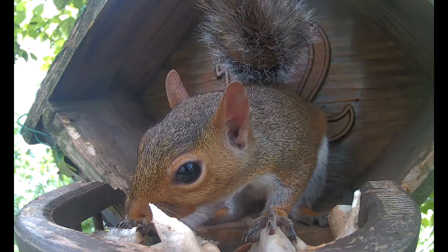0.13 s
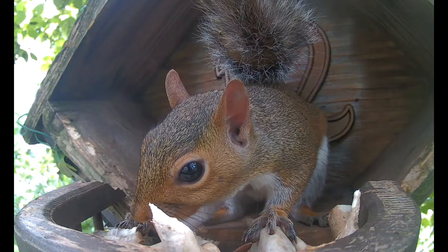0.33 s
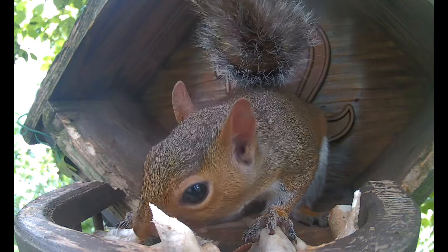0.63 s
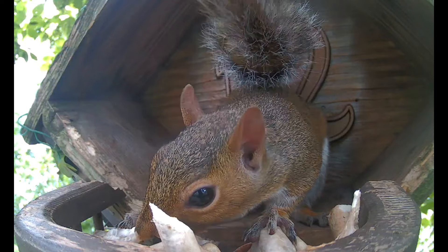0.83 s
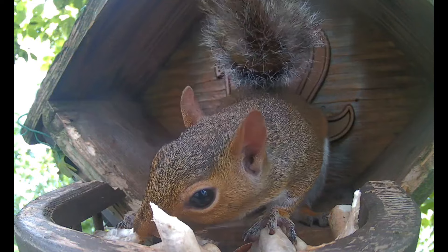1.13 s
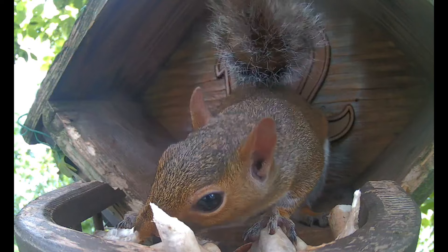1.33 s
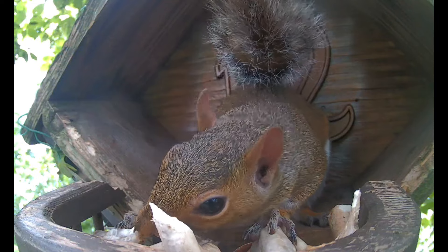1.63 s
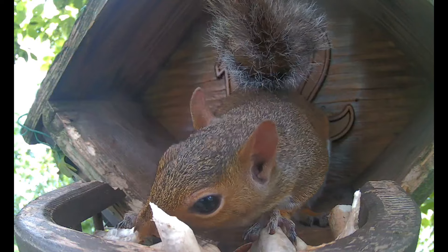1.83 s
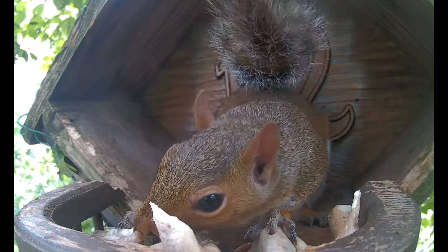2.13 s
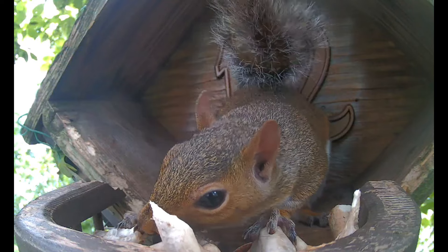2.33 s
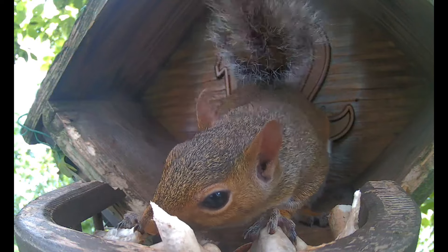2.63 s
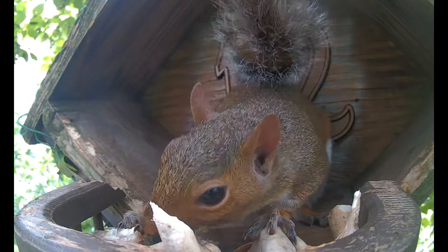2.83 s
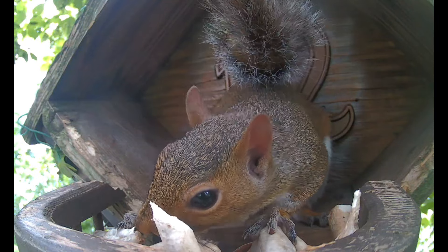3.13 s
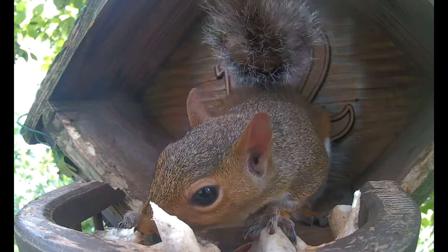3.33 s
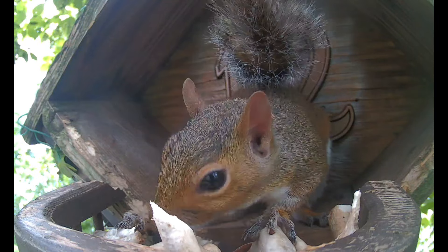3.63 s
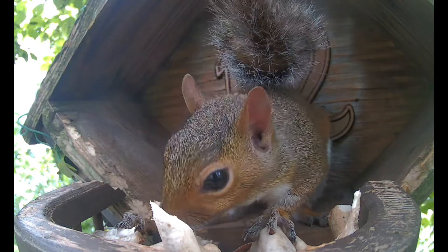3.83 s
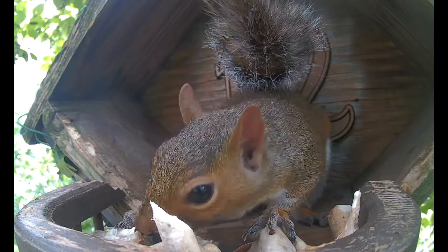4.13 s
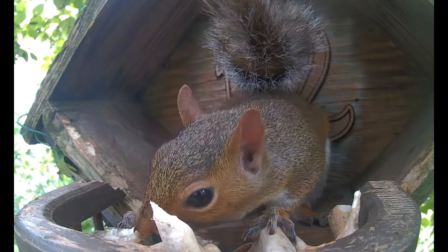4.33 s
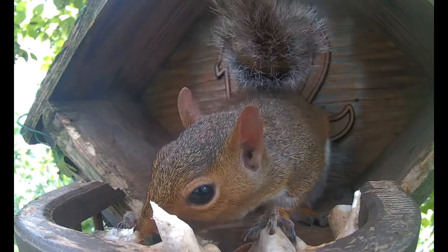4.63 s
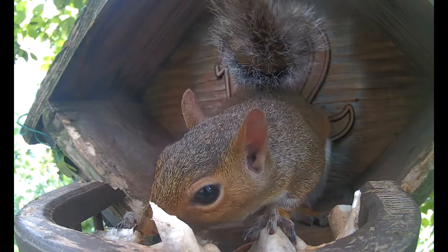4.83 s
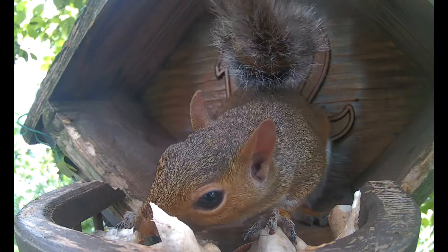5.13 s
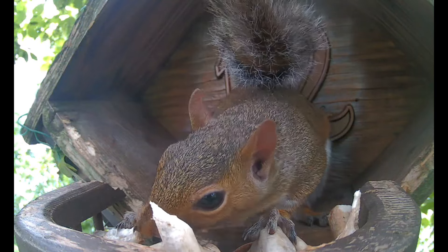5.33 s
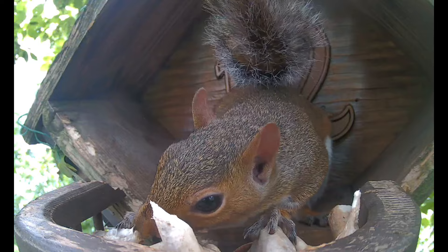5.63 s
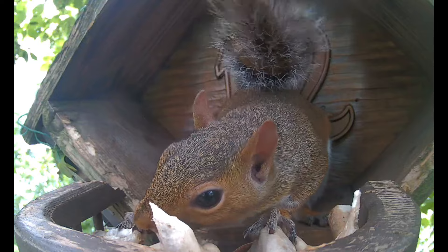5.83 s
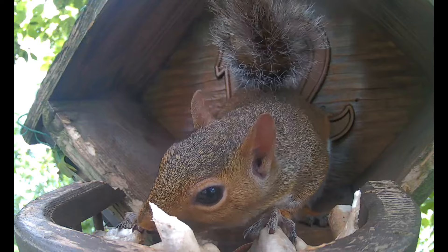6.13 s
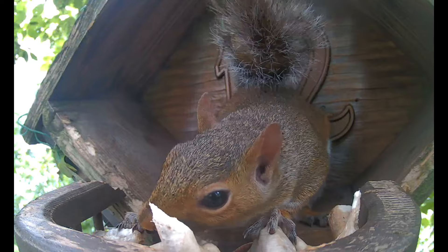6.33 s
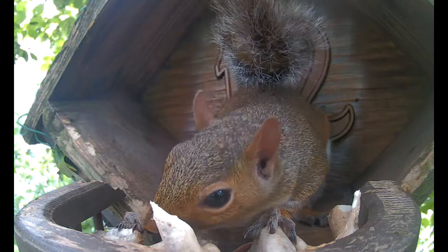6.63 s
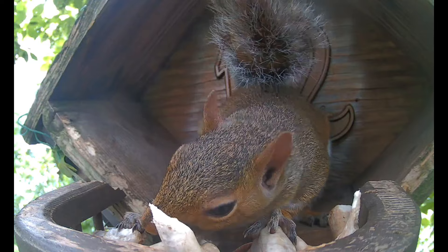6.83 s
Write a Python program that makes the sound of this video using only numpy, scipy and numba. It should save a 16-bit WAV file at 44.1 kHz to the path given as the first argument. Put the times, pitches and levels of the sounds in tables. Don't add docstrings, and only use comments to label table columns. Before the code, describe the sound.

At 0 s the tail of a squirrel's bark is cut off within 0.05 s, ending in a high squeak and a short leafy echo. Near quiet follows: soft hiss, low wind and faint throbbing hum. From 0.5 s teeth tick on seed shell, faint and dry, growing to clear cracks with dull wooden thuds by 2-2.9 s; small airy snorts pass, the longest just before 2.9 s. From 2.94 to 3.45 s comes a loud, hoarse, buzzing bark, swelling late. A pause holds only a couple of faint ticks and a barely audible motor whine around 3.6-4.3 s. Gnawing resumes at 4.3 s, brisker, while a distant squirrel calls blurrily at 4.4-4.95 s. A rough bark sounds at 5.47-5.83 s. The strongest snaps and frame knocks run from 5.9 s to 7 s, with a louder far answer at 6.1-6.7 s. Close, boxy, narrow sound.

```python
import sys
import numpy as np
from scipy import signal
from scipy.io import wavfile
from scipy.ndimage import uniform_filter1d
from numba import njit

SR = 44100
rng = np.random.default_rng(int(sys.argv[2]) if len(sys.argv) > 2 else 0)


def to_linear_factor(level_db):
    exponent = np.asarray(level_db, float) / 20
    return 10 ** exponent


def to_wav(sig):
    pcm = np.clip(np.atleast_2d(sig), -1, 1) * 32767
    pcm = np.round(pcm).astype(np.int16)
    wavfile.write(sys.argv[1], SR, pcm.T)


N = 307369
TIME_S = np.arange(N) / SR

# (time [s], pitch [Hz], roughness [0-1], strong-weak pairing [0-1])
FOLDS = [
    [(0, 383, .1, 0), (.012, 405, .06, 0), (.026, 421, .04, 0), (.039, 428, .06, 0)],
    [(2.945, 405, .08, 0), (2.978, 475, .25, .2), (3.02, 472, .45, .25), (3.045, 505, .45, .3),
     (3.09, 470, .45, .2), (3.125, 500, .4, .15), (3.21, 470, .35, .4), (3.305, 512, .35, .7),
     (3.435, 435, .25, .25)],
    [(5.473, 410, .1, 0), (5.497, 445, .25, 0), (5.53, 412, .35, .3), (5.555, 455, .3, .5),
     (5.605, 500, .35, .4), (5.67, 490, .4, .2), (5.71, 455, .4, .4), (5.75, 460, .35, .6),
     (5.82, 475, .35, 0)],
]
# (time [s], level [dB], mouth resonance [Hz], second mouth resonance [Hz])
EFFORT = [
    [(0, -15, 2494, 4413), (.034, -20, 2232, 4362), (.046, -19, 2070, 3532)],
    [(2.945, -15, 1873, 3564), (2.995, -17.5, 2564, 3435), (3.06, -14, 2810, 3025), (3.17, -12, 2247, 3456),
     (3.2, -9.5, 2195, 4383), (3.31, -9.5, 2514, 4380), (3.4, -12.5, 2080, 4300),
     (3.436, -13.5, 2057, 3450)],
    [(5.472, -13.5, 2160, 3800), (5.498, -13.5, 2305, 3550), (5.54, -15, 2422, 3040),
     (5.622, -11.5, 2540, 3170), (5.69, -13, 2204, 3420), (5.768, -9.5, 2530, 4000),
     (5.812, -12, 2100, 4100)],
]
# (start [s], rise [s], end [s], fall [s])
VOICING = [
    (-.1, .005, .052, .011),
    (2.936, .008, 3.447, .026),
    (5.465, .008, 5.829, .016),
]
# (start [s], length [s], pitch [Hz], roughness [0-1])
BREAKS = [
    (.038, .03, 1760, .01),
    (2.93, .011, 620, .2),
    (3.309, .023, 585, .12),
    (5.46, .009, 620, .2),
    (5.762, .029, 585, .17),
]
# (time [s], lower [dB], middle [dB], upper [dB], top throat resonance [dB])
JAW = [
    [(0, -6.5, 0, -3.5, 3), (.036, -7, 2.5, -6, -1.5), (.046, 3.5, -4.5, 10.5, -5)],
    [(2.945, -0.5, -2.5, -7, 9), (3.0, 3, -2.5, 1, -3.5), (3.1, 2, 2, 1.5, -9), (3.16, 0, 3, -1, -4),
     (3.205, 2, -1.5, -2.5, 11), (3.255, 3, -3, -3, 6.5), (3.315, 0, 0.5, -4, -4.5),
     (3.39, -1, -3.5, 2, 6.5), (3.44, 3.5, -3, -1, -4.5)],
    [(5.47, -4.5, -8, -9, 6), (5.52, -1.5, 3, -8, 1), (5.6, 2.5, 6, -6, -16.5), (5.68, 1.5, 0, -0.5, 8),
     (5.75, 4, 4.5, 1, 3.5), (5.82, -5.5, -2, -7.5, -6.5)],
]
THROAT_HZ = [1770, 2500, 3600, 4200]
# (frequency [Hz], width [Hz], level [dB])
CHEST = [(298, 78, -26.5), (407, 83, -24), (740, 110, -27.5), (970, 130, -20), (1180, 120, -27.5)]
# (frequency [Hz], width [Hz], level [dB])
OVERTONES = [(5190, 740, -44), (7250, 540, -46.5), (4650, 180, -46.5)]
# (frequency [Hz], width [Hz], level [dB])
HOUSING = [(337, 23, -10), (440, 59, -14), (961, 170, -9), (1148, 87, -7.5), (1703, 183, -0.5),
           (2264, 300, -2.5), (2540, 95, 2), (3052, 530, -7.5), (3578, 190, 4), (4237, 150, -25.5)]
# (frequency [Hz], width [Hz], depth [0-1])
VALLEYS = [(620, 47, 0.6), (1365, 540, 1), (1992, 140, 1), (4000, 490, .7)]
# (time [s], peak [dB], brightness [dB], thud through wood [dB])
CRACKS = [(.526, -59.5, 8, -82), (.6921, -62, -12, -51), (.7032, -50.5, -10, -43.5), (.85, -53, -31.5, -48),
          (.8632, -40, -26, -44.5), (.8895, -48, -9, -74), (.8997, -33, -19, -43.5), (.9165, -44, -11, -66),
          (.9258, -39, -6, -54), (1.0428, -57, -26, -62), (1.0624, -43, -36, -50.5), (1.08, -34, -27, -76),
          (1.0974, -34.5, -25, -44), (1.2274, -54, -22, -54.5), (1.243, -55, -30, -75),
          (1.2717, -33.5, -18.5, -48.5), (1.293, -48, -12, -72), (1.4334, -53, -23, -52),
          (1.4524, -35, -18, -47), (1.5273, -65.5, -13, -53.5), (1.601, -43.5, -25.5, -54),
          (1.7502, -56.5, -11.5, -54.5), (1.7693, -48, -20.5, -61.5), (1.8813, -40.5, -31, -58),
          (1.9093, -35, -32.5, -45), (1.9847, -45.5, -31, -84), (1.9937, -50, -22, -76),
          (2.047, -33.5, -31, -46), (2.075, -33.5, -26, -42), (2.169, -55, -35, -47),
          (2.2108, -36, -34.5, -44), (2.2331, -26, -18.5, -48.5), (2.2822, -42.5, -16, -51.5),
          (2.3707, -45, -30, -63), (2.4086, -28.5, -0.5, -62.5), (2.452, -52.5, -10.5, -58),
          (2.559, -31, -15.5, -42.5), (2.6146, -28, 0, -48), (2.754, -19.5, -15, -37),
          (2.8658, -33, -46, -45.5), (3.5376, -48, -28, -47.5), (3.6798, -66, 10.5, -77),
          (4.298, -41.5, -22.5, -62), (4.31, -38, -13, -64), (4.337, -29, -14.5, -46),
          (4.4628, -35, -67, -47), (4.5063, -36, -7, -50), (4.619, -38, 1, -57), (4.646, -22.5, -32, -45),
          (4.796, -36, -15, -44), (4.817, -26, -19, -69), (4.8438, -17.5, -5, -38),
          (4.87, -23, -1.5, -39.5), (5.018, -21, -3, -40), (5.034, -29, -5.5, -45),
          (5.1332, -47.5, -34.5, -58), (5.1648, -31.5, -27, -50), (5.188, -41.5, -21, -88),
          (5.216, -34.5, -9, -68), (5.2251, -22, -12, -39.5), (5.333, -42.5, -42, -50.5),
          (5.3614, -36, -15, -48.5), (5.369, -47, -1.5, -70), (5.325, -53, -33, -70.5),
          (5.406, -23.5, 2.5, -30),
          (5.9035, -38, -16, -42.5), (5.9242, -16.5, -8, -31.5), (5.939, -23.5, -19, -65),
          (6.031, -50, -27, -46), (6.07, -18.5, -16, -43), (6.0905, -22.5, -22, -48.5),
          (6.1183, -30, -37, -44), (6.2236, -33.5, -27, -40), (6.248, -25, -17, -38),
          (6.2565, -27, -10, -48), (6.4023, -29.5, -21, -45.5), (6.4408, -16.5, -4, -46.5),
          (6.509, -45, 4, -46.5), (6.5951, -19.5, -14, -46), (6.6543, -21, 2, -33), (6.675, -46, -8, -69),
          (6.687, -52.5, -1, -73), (6.7647, -33.5, -26, -42.5), (6.785, -33, -13, -59),
          (6.795, -31, -19, -67.5), (6.801, -34, -10, -83), (6.8102, -14.5, -13, -34),
          (6.92, -58, -30, -60), (6.925, -33.5, -67, -63), (6.936, -30, -28, -53),
          (6.9424, -26, -13.5, -33), (6.951, -35, -16, -65), (6.9654, -35, -14, -70)]
BITES = np.array(CRACKS)
# (time [s], peak [dB])
CHIPS = [(0.9277, -54.5), (3.68, -64.5), (4.4618, -60), (4.8155, -51), (5.034, -34), (5.9257, -45.5),
         (6.0342, -67), (6.2482, -54), (6.4424, -40), (6.6547, -78), (6.9424, -49.5)]
# (time [s], peak [dB])
THUDS = [(1.25, -53), (1.295, -52), (1.397, -49), (1.635, -60), (1.677, -60), (1.926, -66), (2.577, -38.5),
         (2.721, -58), (2.766, -44.5), (2.881, -46), (4.285, -56.5), (4.586, -55), (4.696, -49.5),
         (4.742, -49.5), (4.984, -52), (5.094, -48.5), (5.273, -46.5), (5.865, -50.5), (6.132, -55),
         (6.207, -58), (6.343, -44), (6.474, -35.5), (6.576, -45), (6.629, -40), (6.913, -41.5)]
# (time [s], peak [dB])
SHAKES = [(0.916, -68), (1.275, -68), (2.232, -60.5), (2.568, -50), (2.609, -45), (2.752, -57.5),
          (4.646, -59), (4.839, -44), (5.02, -48.5), (5.224, -50), (5.403, -48), (5.897, -44), (6.072, -54),
          (6.114, -51), (6.241, -64), (6.338, -47), (6.469, -52), (6.647, -41.5), (6.807, -53)]
# (start [s], length [s], level [dB], whistle [Hz])
CHUCKS = [(1.102, 0.13, -69.5, 3520), (1.492, 0.12, -67, 2640), (1.966, 0.11, -54, 2580),
          (2.351, 0.11, -55, 2520), (2.55, 0.063, -60.5, 2660), (2.748, 0.046, -52.5, 2710),
          (2.856, 0.25, -46, 2680), (5.018, 0.034, -66.5, 2450), (5.8, 0.11, -54.5, 2700),
          (5.914, 0.05, -46, 2280), (6.667, 0.034, -62, 2970), (6.916, 0.041, -46.5, 2320)]
# (frequency [Hz], width [Hz], level [dB])
CHUCK_COLOUR = [(2350, 260, -4), (2800, 250, -6.5), (3070, 140, -1), (3480, 160, 1)]
# (time [s], level [dB], pitch [Hz])
ANSWERS = [
    [(4.4, -70, 362.7), (4.45, -47.5, 388.3), (4.55, -44, 392), (4.65, -42.5, 389.6), (4.75, -44.5, 395),
     (4.85, -56, 384), (4.95, -78, 371)],
    [(6.1, -56, 369), (6.15, -43.5, 388.3), (6.25, -39.5, 401.4), (6.35, -39.5, 395.8), (6.5, -42, 390.2),
     (6.62, -47, 382.6), (6.72, -75.5, 371)],
]
# (frequency [Hz], width [Hz], level [dB])
FAR_COLOUR = [(1660, 380, -13), (1970, 560, -6), (2480, 710, -3), (2710, 410, 1), (3035, 370, -1),
              (3450, 230, -1.5), (3790, 490, -17), (4420, 330, -23)]
# (time [s], rumble [dB])
WIND = [(0, -53), (.33, -66.5), (2.46, -66), (3.38, -51.5), (3.59, -63.5), (4.17, -70), (4.56, -62),
        (4.8, -55.5), (5.28, -61.5), (5.82, -52.5), (6.74, -56.5), (6.97, -58.5)]
# (start [s], length [s], level [dB])
THROBS = [(-.08, 0.28, -58), (0.273, 0.32, -69.5), (0.595, 0.32, -73.5), (0.91, 0.42, -71.5),
          (1.3, 0.36, -69.5), (1.703, 0.36, -74.5), (2.1, 0.27, -71), (2.432, 0.32, -68),
          (2.711, 0.51, -64.5), (3.003, 0.57, -58.5), (3.505, 0.39, -71.5), (3.9, 0.38, -73.5),
          (4.319, 0.26, -72), (4.644, 0.35, -58.5), (4.988, 0.34, -65.5), (5.45, 0.21, -60),
          (5.72, 0.31, -60.5), (6.0, 0.21, -62), (6.158, 0.24, -59), (6.478, 0.31, -56.5),
          (6.834, 0.18, -67)]
# (time [s], level [dB])
WHINE = [
    (3.45, -99),
    (3.58, -81.5),
    (4.25, -87),
    (4.35, -99.5),
]
# (frequency [Hz], density [dB per Hz])
HISS = [(140, -16), (200, -13), (450, -20), (900, -19.5), (2500, -17), (3400, -23), (4100, -32),
        (4900, -37), (7000, -46)]
# (from [s], to [s])
TOP_SILENT = [(1.065, 1.125), (1.26, 1.32), (1.445, 1.51), (1.9, 1.96), (2.15, 2.785), (2.925, 2.975),
              (4.345, 4.39), (4.54, 4.6), (4.66, 4.7), (4.89, 5.005), (5.165, 5.47), (6.05, 6.11),
              (6.57, 6.82)]


def rms_one(x):
    return x / np.sqrt(np.mean(x ** 2) + 1e-20)


def curves(tables):
    time_s, *columns = np.transpose(np.vstack(tables))
    return [np.interp(TIME_S, time_s, column) for column in columns]


def gated_curves(tables):
    level_db, *others = curves(tables)
    sounding = sum((TIME_S >= rows[0][0]) & (TIME_S <= rows[-1][0] + .011) for rows in tables) > 0
    return [to_linear_factor(level_db) * uniform_filter1d(sounding * 1., size=90)] + others


def passed(x, hz, kind, order=2):
    return signal.sosfilt(signal.butter(order, hz, kind, fs=SR, output="sos"), x + 1e-18)


def steep_cut(x):
    return signal.sosfilt(signal.ellip(8, 1, 50, 4480, fs=SR, output="sos"), x)


def drift(rate_hz):
    return rms_one(passed(rng.standard_normal(N), rate_hz, "low"))


def resonance(x, hz, width_hz):
    r = np.exp(-np.pi * width_hz / SR)
    numerator = np.array([1, 0, -1]) * (1 - r * r) / 2
    return signal.lfilter(numerator, [1, -2 * r * np.cos(2 * np.pi * hz / SR), r * r], x + 1e-18)


@njit
def sliding_two_pole(x, cosine, r):
    out = np.zeros(len(x))
    for i in range(2, len(x)):
        out[i] = (1 - r * r) / 2 * (x[i] - x[i - 2]) + 2 * r * cosine[i] * out[i - 1] - r * r * out[i - 2]
    return out


def sliding_resonance(x, hz, width_hz):
    return sliding_two_pole(x + 1e-18, np.cos(2 * np.pi * hz / SR), np.exp(-np.pi * width_hz / SR))


def resonance_bank(source_at, resonances):
    return sum((-1) ** k * to_linear_factor(db) * resonance(source_at(hz), hz, width_hz)
               for k, (hz, width_hz, db) in enumerate(resonances))


def scatter(at_s, gains, shapes):
    out = np.zeros(N + SR)
    starts = np.round(at_s * SR).astype(int)[:, None]
    np.add.at(out, starts + np.arange(shapes.shape[1]), gains[:, None] * shapes)
    return out[:N]


def echoes(x, t60_s):
    t = np.arange(round(t60_s * SR)) / SR
    tail = rng.standard_normal(len(t)) * to_linear_factor(-60 * t / t60_s)
    return signal.fftconvolve(x, tail / np.sqrt(np.sum(tail ** 2)))[:N]


def folds(pitch_hz, rough, pairing):
    jitter = .12 * drift(250) + 0.05 * drift(40)
    cycles = 0.96 + np.cumsum(pitch_hz * (1 + rough * jitter)) / SR
    at = np.flatnonzero(np.diff(np.floor(cycles))) + 1
    late = (cycles[at] % 1) / (cycles[at] - cycles[at - 1])
    shimmer_db = 4.5 * rough[at] * np.clip(rng.standard_normal(len(at)), -2, 2)
    size = (1 - pairing[at] * (np.arange(len(at)) % 2)) * to_linear_factor(shimmer_db)
    size = size * np.sqrt(SR / pitch_hz[at])
    pulses = np.zeros(N)
    pulses[at], pulses[at - 1] = size * (1 - late), size * late
    breath = rng.standard_normal(N) * np.sqrt(1 + np.cos(2 * np.pi * cycles))
    return np.sqrt(1 - .4 * rough) * pulses + np.sqrt(.4 * rough) * breath


def fold_controls():
    pitch_hz, rough, pairing = curves(FOLDS)
    for start, length_s, hz, clear in BREAKS:
        flip = np.clip(np.minimum(TIME_S - start, start + length_s - TIME_S) / .004, 0, 1)
        pitch_hz = pitch_hz + flip * (hz - pitch_hz)
        rough = rough + flip * (clear - rough)
        pairing = pairing * (1 - flip)
    return pitch_hz, rough, pairing


def throat_weighting(level_db):
    lower_db, middle_db, upper_db, top_db = curves(JAW)
    opening_db = 5 * sum((TIME_S - (start + end) / 2) * (TIME_S > start) * (TIME_S < end + fall)
                         for start, rise, end, fall in VOICING)
    effort_db = level_db + 20.5
    throat_db = [-1 + lower_db - 0.26 * opening_db,
                 -6 + middle_db,
                 -11 + upper_db + 0.8644 * effort_db + opening_db,
                 3 + top_db + 0.91 * effort_db + opening_db]
    throat_db = [db + 2.5 * drift(2.7) for db in throat_db]

    def weight(hz):
        return to_linear_factor(sum(np.interp(hz, THROAT_HZ, share) * db for share, db in zip(np.eye(4), throat_db)))
    return weight


def chest_voice(pulses):
    waking = to_linear_factor(-13.5 * sum(np.exp(-np.abs(TIME_S - start) / 0.087) for start, *_ in VOICING))
    chest = resonance_bank(lambda hz: pulses * (waking if hz > 600 else 1), CHEST)
    pop = sum(np.exp(-((TIME_S - start - rise) / 0.0077) ** 2) for start, rise, *_ in VOICING)
    return chest + to_linear_factor(-18.5) * passed(pop * rng.standard_normal(N), [620, 1300], "band")


def capsule(x):
    return x / (1 + (x / .8) ** 4) ** (1 / 4)


def barks():
    level_db, mouth_hz, palate_hz = curves(EFFORT)
    pitch_hz, rough, pairing = fold_controls()
    voice = folds(pitch_hz, rough, pairing)
    chest = chest_voice(folds(pitch_hz, .75 * rough, pairing))
    gate = sum(np.clip((TIME_S - start) / rise, 0, 1) * np.clip((end - TIME_S) / fall, 0, 1) ** 1.1
               for start, rise, end, fall in VOICING)
    loudness = gate * to_linear_factor(level_db)

    weight = throat_weighting(level_db)
    mouthed = voice + 1.6 * sliding_resonance(voice, mouth_hz, 170) + sliding_resonance(voice, palate_hz, 170)
    body = resonance_bank(lambda hz: mouthed * weight(hz) * to_linear_factor(-1.0) * (hz > 1300), HOUSING)
    body = body + to_linear_factor(-17.0) * passed(voice, [1600, 4300], "band") - to_linear_factor(-10.5) * resonance(voice, 3150, 350)
    fast_power, slow_power = [uniform_filter1d(body ** 2, size=n) + 1e-12 for n in (260, 2600)]
    body = body * (slow_power / fast_power) ** .35

    strain = loudness * sum(np.clip((TIME_S - start) / 0.04 - .4, 0, 1) * (TIME_S < end)
                            for start, rise, end, fall in VOICING)
    thin = sum(to_linear_factor(db + 3.5) * resonance(voice, hz, width_hz) for hz, width_hz, db in OVERTONES)
    thin_gain = 1.1 * np.clip(strain / (loudness + 1e-9), 0, 1) ** 1.2 * loudness ** 0.29
    thin = thin_gain * passed(thin, 3300, "high", order=4)

    near = passed(steep_cut(capsule(to_linear_factor(18.0) * loudness * body)), 650, "high")
    near = near + to_linear_factor(18.5) * loudness * chest
    for hz, width_hz, depth in VALLEYS:
        near = near - depth * resonance(near, hz, width_hz)
    near = passed(near + to_linear_factor(24.5) * loudness * thin, 225, "high", order=6)

    scattered = steep_cut(passed(rng.standard_normal(N), [1400, 4400], "band") * loudness)
    top_noise = passed(rng.standard_normal(N), [4500, 5800], "band", order=4)
    return near + to_linear_factor(-10.5) * echoes(scattered + to_linear_factor(-21.5) * loudness * top_noise, 0.18)


def bites():
    time_s, peak_db, bright_db, _ = BITES.T
    t = np.arange(-600, 2200) / SR
    age_s = np.abs(t)
    draws = rng.standard_normal((len(BITES), len(t)))
    dull_db = np.maximum(-bright_db, 0)[:, None]
    crumble = to_linear_factor(-36.5 + 0.5262 * dull_db) * np.exp(-age_s / 0.012)
    after = to_linear_factor(-60 * age_s / (0.0041 * (1.5 + 0.3852 * dull_db))) + to_linear_factor(-17.0 - 60 * age_s / 0.075)
    grains = draws * np.abs(draws) ** 0.82 * to_linear_factor(-14)
    splinter = grains * np.where(t < 0, crumble, after)
    splinter[:, t == 0] = 3.52
    uneven_db = 1.5 * rng.standard_normal((len(BITES), 6))

    def source(hz):
        colour_db = []
        for high_db, chance_db in zip(bright_db, uneven_db):
            tilt_db = [-3.0, -4, 0, 0.35 * high_db + 0.29, high_db + 2.0, 1.5 * high_db + 2.0]
            colour_db.append(np.interp(hz, [440, 1050, 1770, 2450, 3600, 4200], tilt_db + chance_db))
        return scatter(time_s + t[0], to_linear_factor(peak_db + colour_db), splinter)
    return to_linear_factor(20.0) * steep_cut(resonance_bank(source, HOUSING))


def chips():
    rows, t = np.array(CHIPS), np.arange(1500) / SR
    decay = to_linear_factor(-60 * t / 0.0016) + to_linear_factor(-21.0 - 60 * t / 0.079)
    fizz = rng.standard_normal((len(rows), len(t))) * decay
    return to_linear_factor(15.0) * passed(scatter(rows[:, 0], to_linear_factor(rows[:, 1]), fizz), [4600, 6300], "band", order=3)


def thuds():
    after_bites = BITES[:, [0, 3]] + [0.0035, 0]
    rows, t = np.vstack([THUDS, after_bites]), np.arange(2000) / SR
    pitch_hz = 430 * (1 + 0.051 * rng.standard_normal((len(rows), 1)))
    rub = 5.1 * rng.standard_normal((len(rows), len(t)))
    push = (np.sin(2 * np.pi * pitch_hz * t) + rub) * (1 - np.exp(-t / .005)) * to_linear_factor(-60 * t / .1)
    pushes = passed(scatter(rows[:, 0], to_linear_factor(rows[:, 1]), push), [310, 800], "band")
    pushes = pushes + to_linear_factor(-10.5) * echoes(pushes, .3)
    wood = resonance(pushes, 456, 90) + to_linear_factor(-2.0) * resonance(pushes, 340, 140)
    return to_linear_factor(3.0) * (wood - to_linear_factor(-16.0) * resonance(pushes, 640, 240))


def shakes():
    rows, t = np.array(SHAKES), np.arange(1500) / SR
    jolt = rng.standard_normal((len(rows), len(t))) * np.sin(np.pi * np.clip(t / 0.018, 0, 1))
    return to_linear_factor(16) * passed(scatter(rows[:, 0], to_linear_factor(rows[:, 1]), jolt), [90, 280], "band")


def chucks():
    level, whistle_hz = np.zeros(N), np.full(N, 2500.)
    for start, length_s, level_db, hz in CHUCKS:
        progress = np.clip((TIME_S - start) / length_s, 0, 1)
        level += to_linear_factor(level_db) * np.sin(np.pi * progress ** 0.58)
        whistle_hz = np.where(progress > 0, hz * (1 + 0.12 * (progress - .5)), whistle_hz)
    air = level * passed(rng.standard_normal(N), [1300, 3800], "band") * to_linear_factor(2.4 * drift(80))
    whistle = sliding_resonance(air, whistle_hz, 190)
    pulses = folds(whistle_hz / 5, np.full(N, .3), np.full(N, .1))
    buzz = level * passed(pulses, [1300, 3800], "band")
    jet = 1.1 * air + 10.0 * whistle + 1.2 * buzz
    coloured = passed(resonance_bank(lambda hz: jet, CHUCK_COLOUR), 3300, "low", order=4)
    low_resonance = sliding_resonance(air + buzz, 0.62 * whistle_hz, 260)
    return to_linear_factor(10.0) * steep_cut(coloured + 0.7 * low_resonance + 0.97 * whistle)


def answers():
    level, pitch_hz = gated_curves(ANSWERS)
    voice = level * folds(pitch_hz, np.full(N, .3), np.full(N, .15))
    voice = voice + 0.5 * sum(sliding_resonance(voice, ratio * pitch_hz, 150) for ratio in (6.1, 8.8))
    voice = 0.21 * voice + echoes(voice, 0.052)
    far = resonance_bank(lambda hz: voice, FAR_COLOUR)
    return to_linear_factor(19.0) * steep_cut(passed(far, 1500, "high", order=4))


def background():
    white = rng.standard_normal((2, N))
    wind_db, = curves([WIND])
    wind = to_linear_factor(wind_db) * rms_one(passed(passed(rng.standard_normal(N), 5.3, "high"), 75, "low", order=4))

    edges_hz = 140 * 2 ** np.arange(0, 6.1, .5)
    hiss_hz, hiss_db = np.transpose(HISS)
    hiss = to_linear_factor(-20.5) * resonance(white[0], 3450, 200)
    for k, (low, high) in enumerate(zip(edges_hz, edges_hz[1:])):
        band_db = np.interp(np.log(np.sqrt(low * high)), np.log(hiss_hz), hiss_db)
        hiss = hiss + to_linear_factor(band_db) * passed(white[k % 2], [low, high], "band")
    rustle_db = -71.5 + 0.94 * (wind_db + 65.5)
    rustle = to_linear_factor(rustle_db) * to_linear_factor(1.5 * drift(7.3)) * rms_one(hiss)
    preamp = to_linear_factor(-89.5) * rms_one(passed(white[1], [4600, 7000], "band", order=6))

    throb = sum(to_linear_factor(db) * np.sin(np.pi * np.clip((TIME_S - start) / length_s, 0, 1))
                for start, length_s, db in THROBS)
    hum = throb * to_linear_factor(0.42 * drift(5.2)) * np.sqrt(2) * np.sin(2 * np.pi * 118.6 * TIME_S)
    whine = gated_curves([WHINE])[0] * np.sqrt(2) * np.sin(2 * np.pi * 566 * TIME_S)
    return rustle + preamp + wind + hum + whine


def scene():
    near = barks() + bites() + chips() + thuds() + shakes() + chucks()
    return (near + answers() + background())[None]


def silence_top(x):
    shut = sum((TIME_S > start) & (TIME_S < end) for start, end in TOP_SILENT) * 1.
    top = signal.sosfiltfilt(signal.butter(8, 4570, "high", fs=SR, output="sos"), x)
    return x - uniform_filter1d(shut, size=300) * top


def band_limit(x):
    return signal.sosfilt(signal.butter(12, 7530, fs=SR, output="sos"), x)


def record(dry):
    limited = silence_top(dry / (1 + (dry / .9) ** 10) ** (1 / 10))
    mix = signal.sosfilt(signal.cheby2(10, 60, 8100, fs=SR, output="sos"), limited)
    return band_limit(mix)


dry = scene()
out = record(dry)
to_wav(out)
```